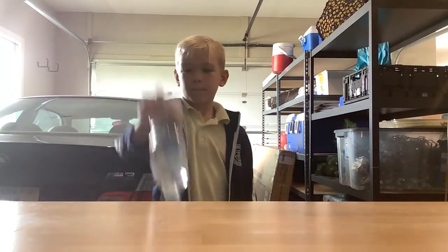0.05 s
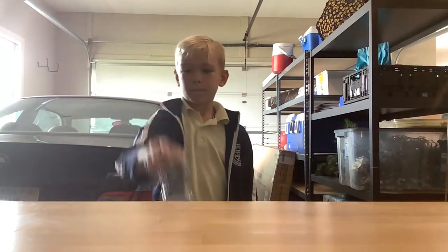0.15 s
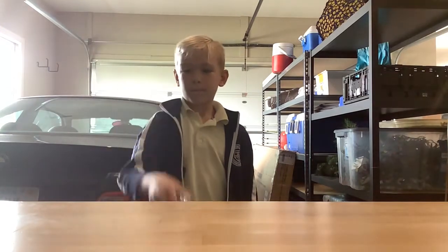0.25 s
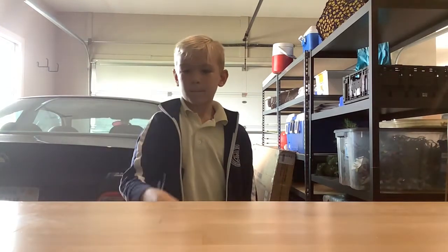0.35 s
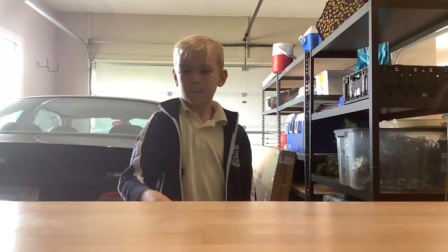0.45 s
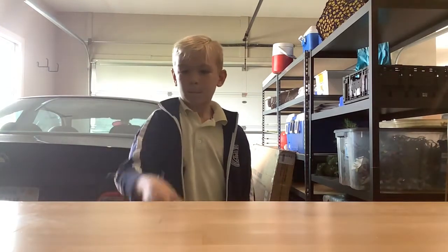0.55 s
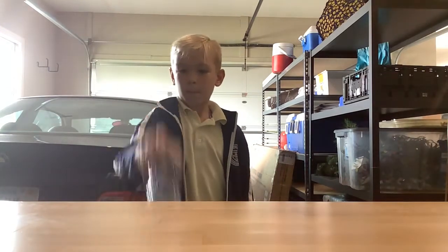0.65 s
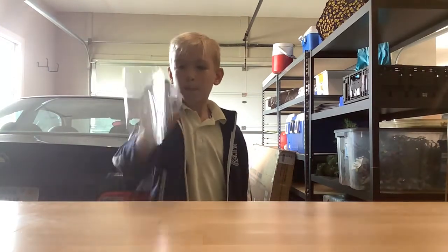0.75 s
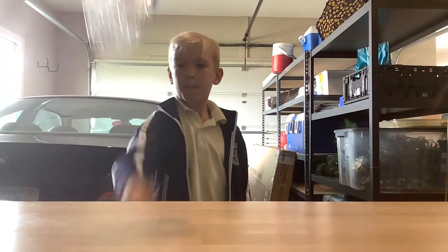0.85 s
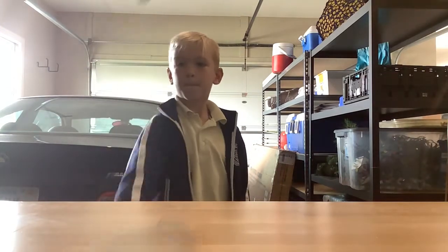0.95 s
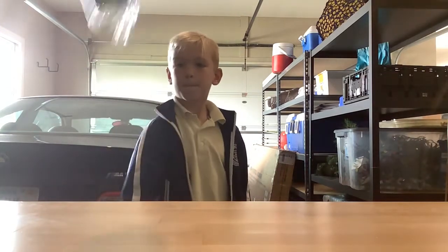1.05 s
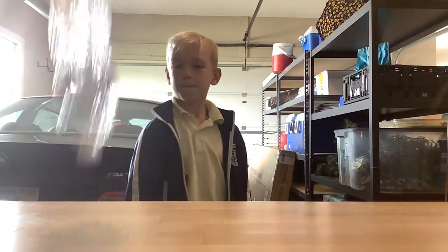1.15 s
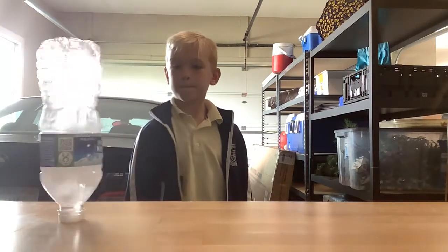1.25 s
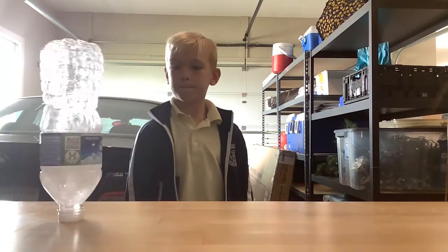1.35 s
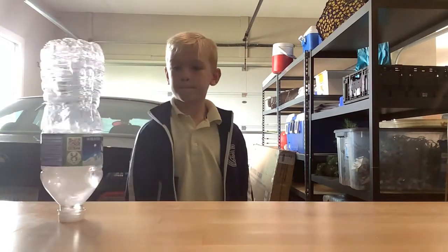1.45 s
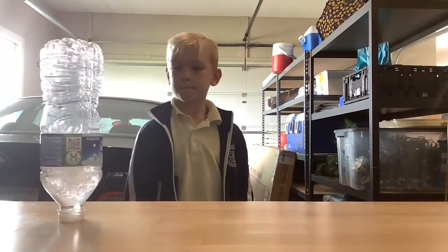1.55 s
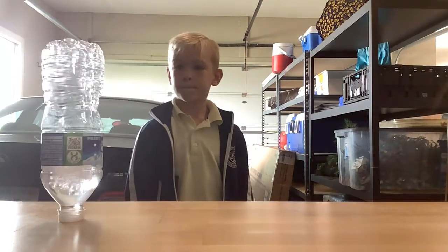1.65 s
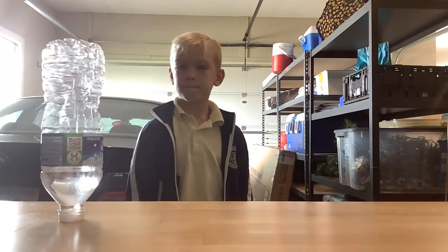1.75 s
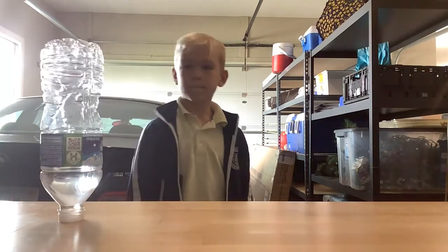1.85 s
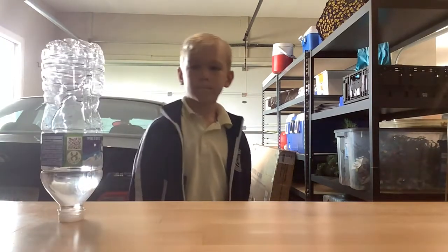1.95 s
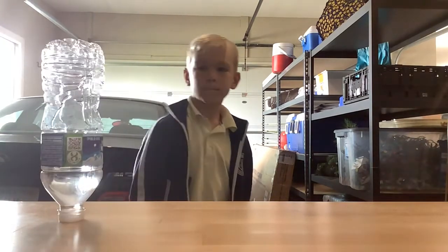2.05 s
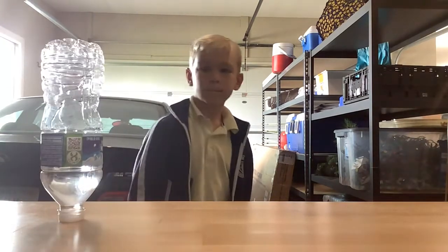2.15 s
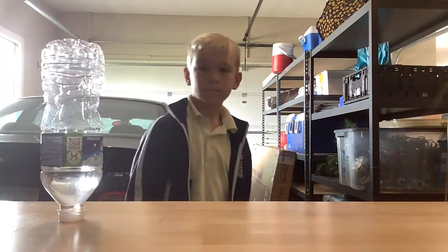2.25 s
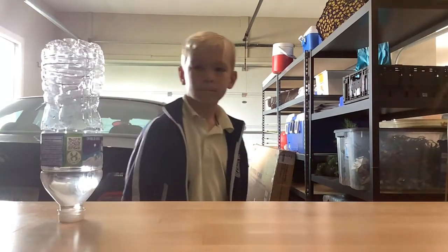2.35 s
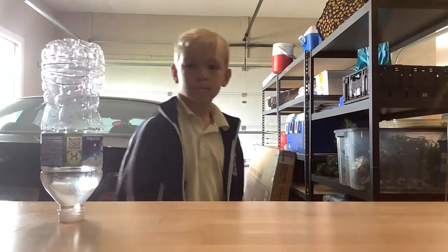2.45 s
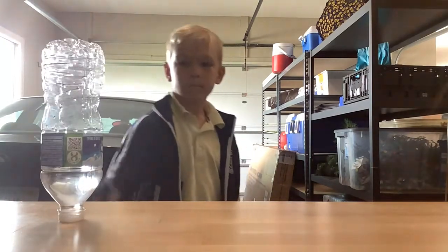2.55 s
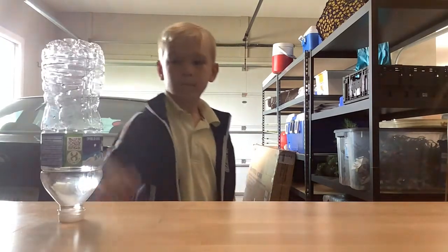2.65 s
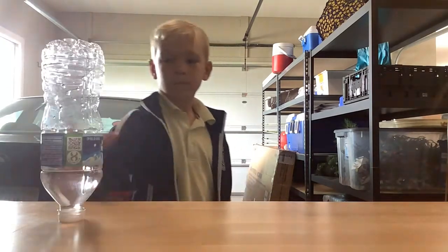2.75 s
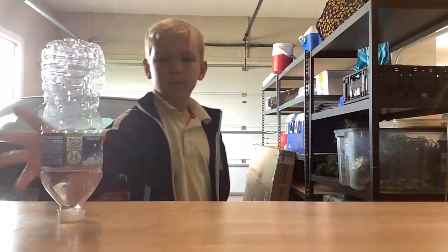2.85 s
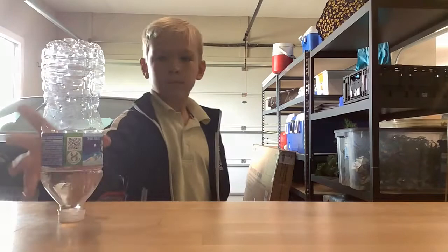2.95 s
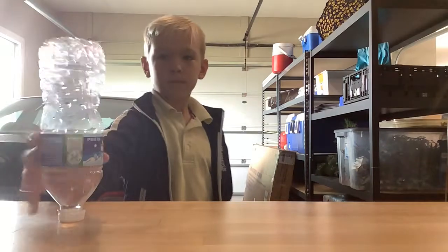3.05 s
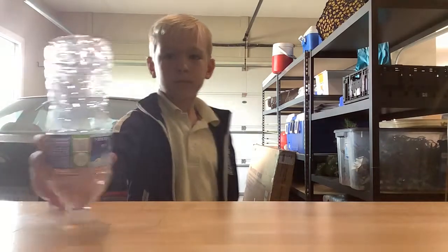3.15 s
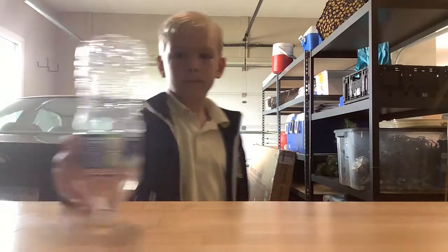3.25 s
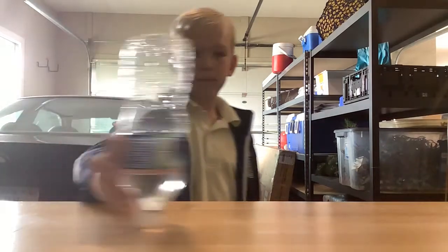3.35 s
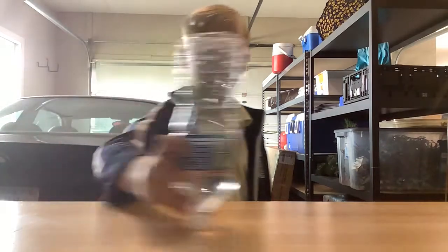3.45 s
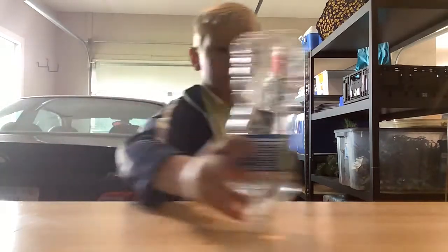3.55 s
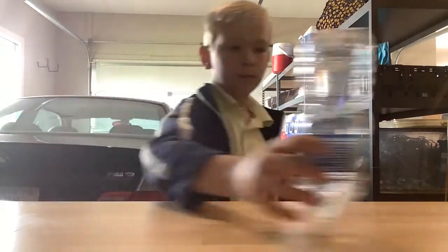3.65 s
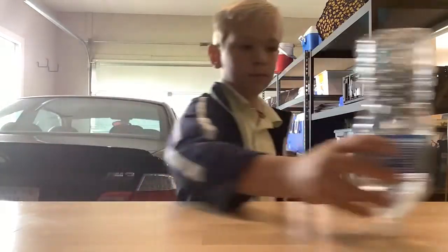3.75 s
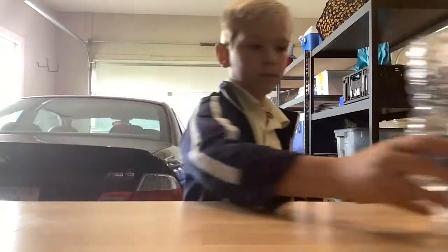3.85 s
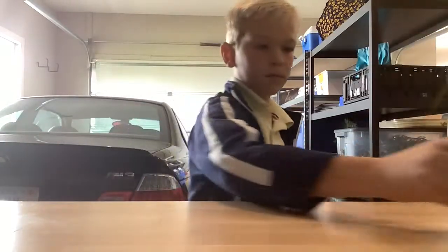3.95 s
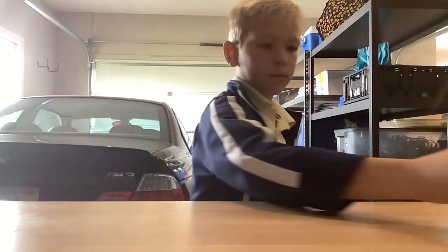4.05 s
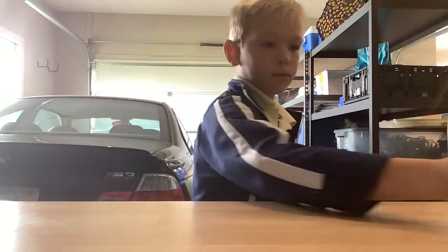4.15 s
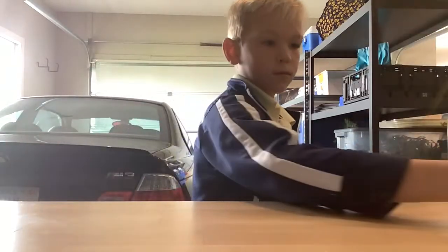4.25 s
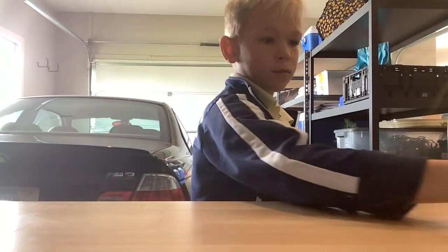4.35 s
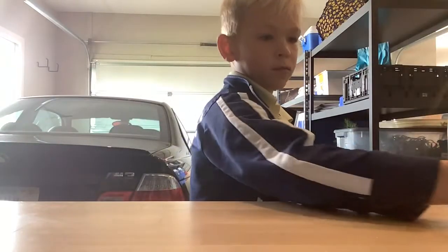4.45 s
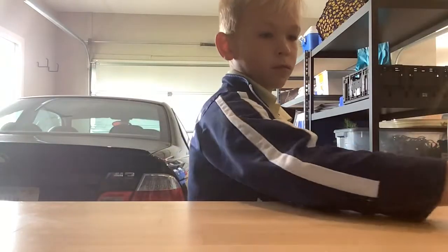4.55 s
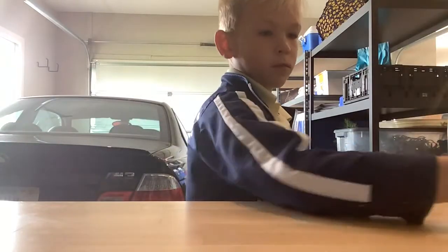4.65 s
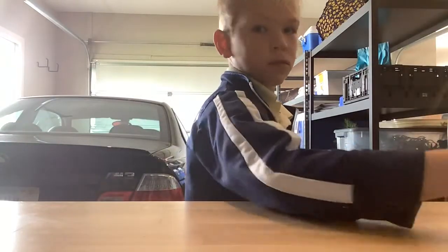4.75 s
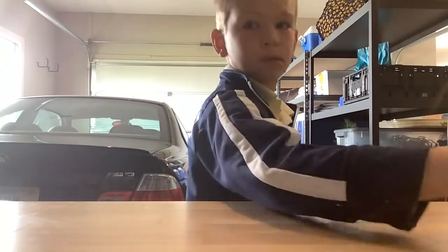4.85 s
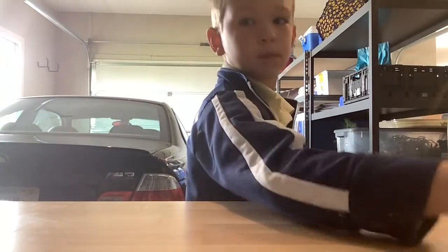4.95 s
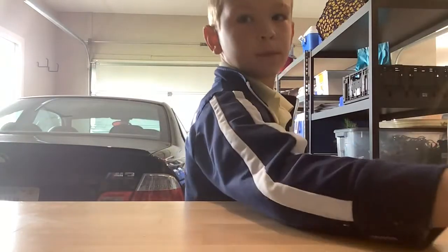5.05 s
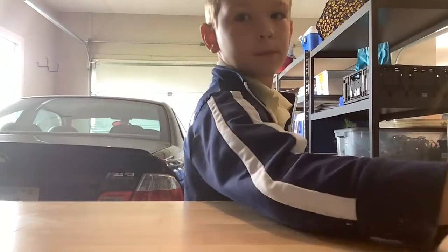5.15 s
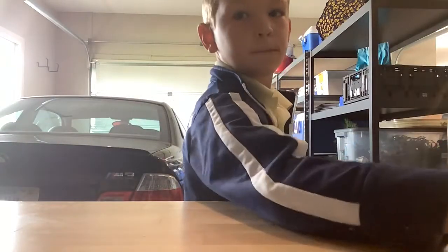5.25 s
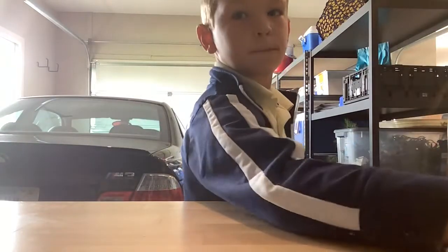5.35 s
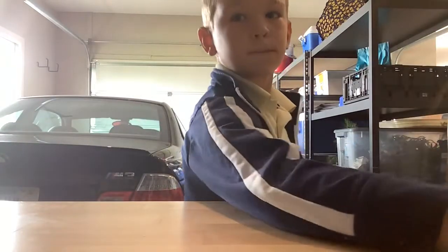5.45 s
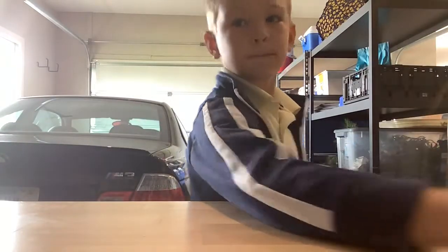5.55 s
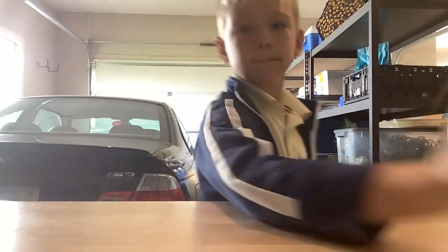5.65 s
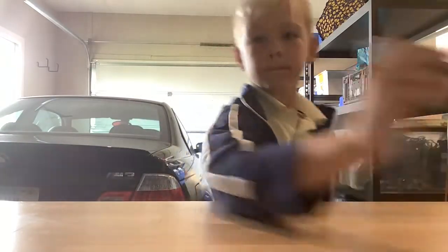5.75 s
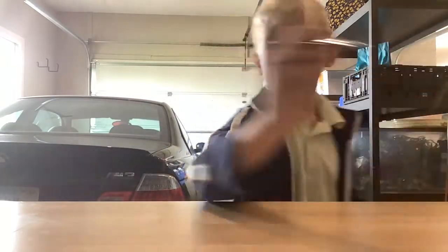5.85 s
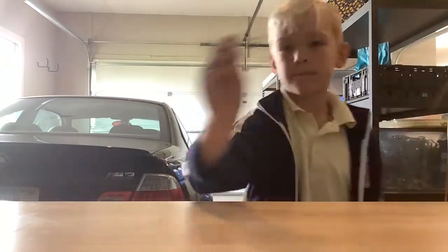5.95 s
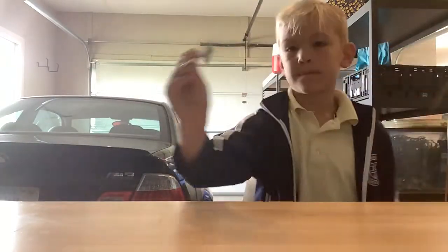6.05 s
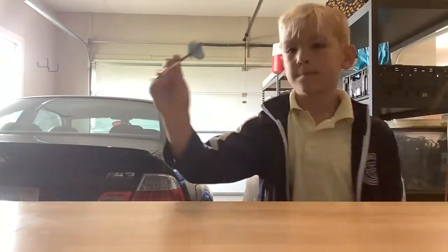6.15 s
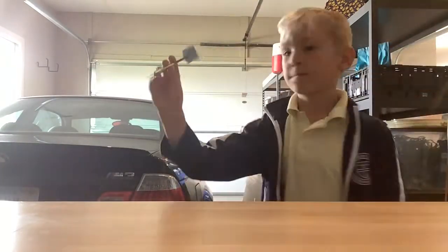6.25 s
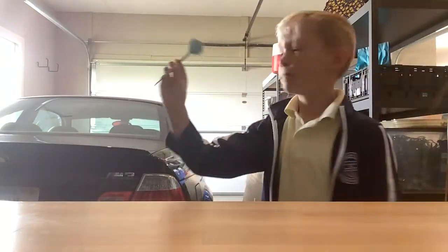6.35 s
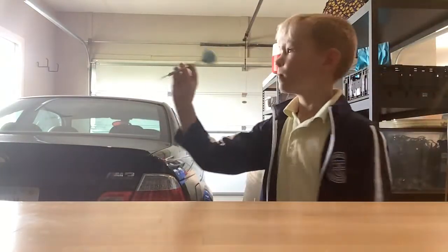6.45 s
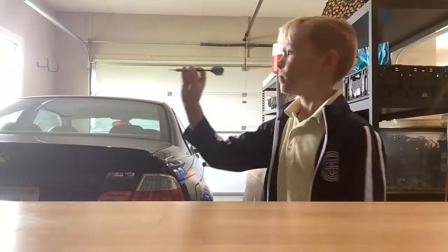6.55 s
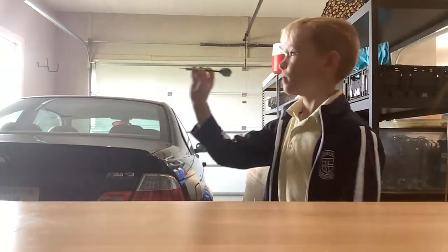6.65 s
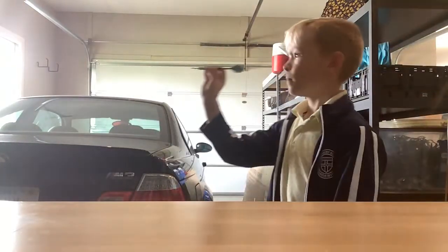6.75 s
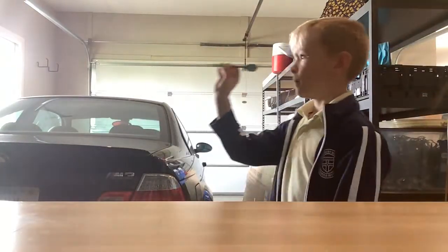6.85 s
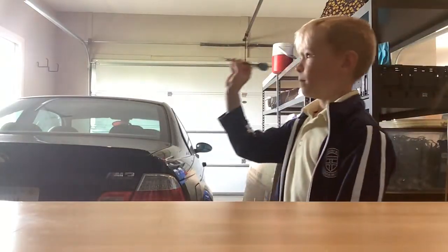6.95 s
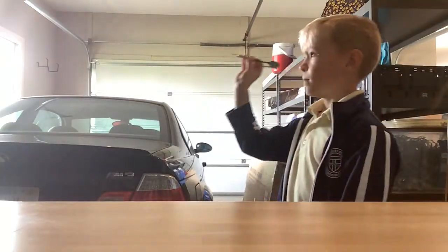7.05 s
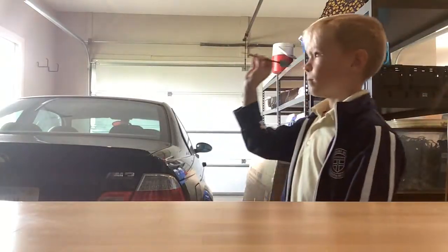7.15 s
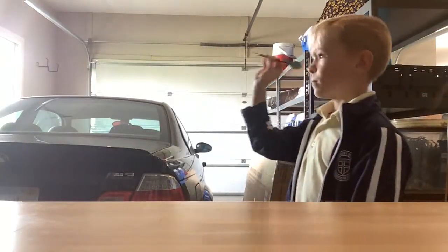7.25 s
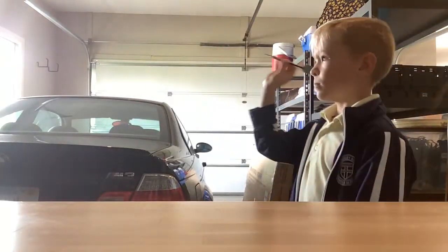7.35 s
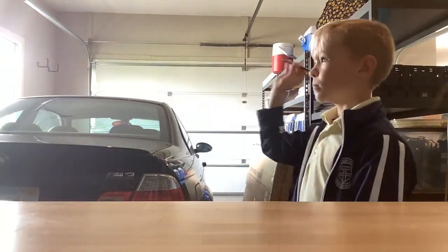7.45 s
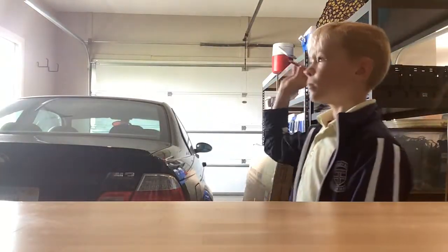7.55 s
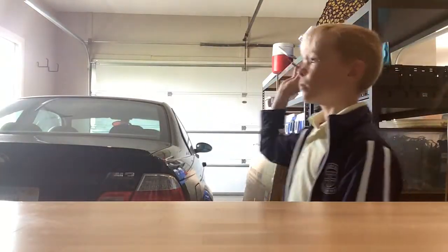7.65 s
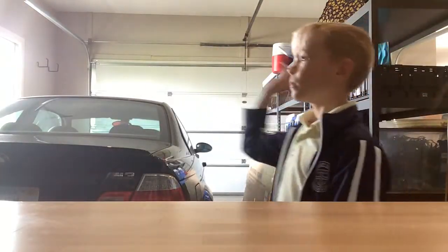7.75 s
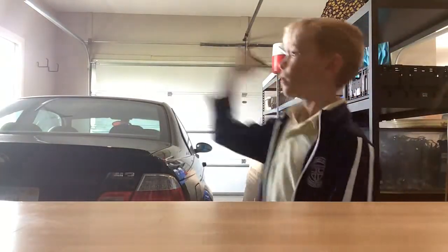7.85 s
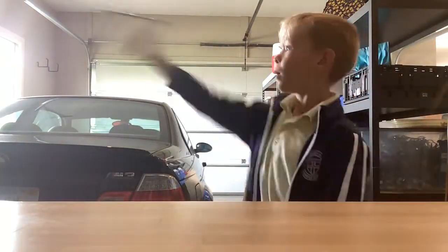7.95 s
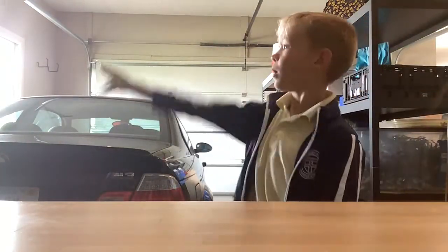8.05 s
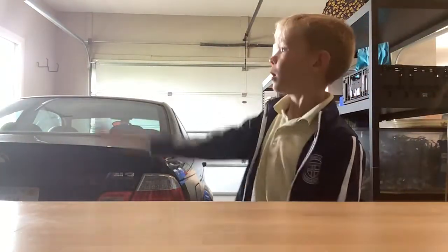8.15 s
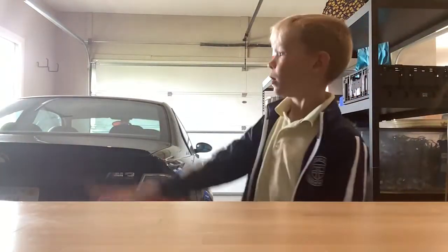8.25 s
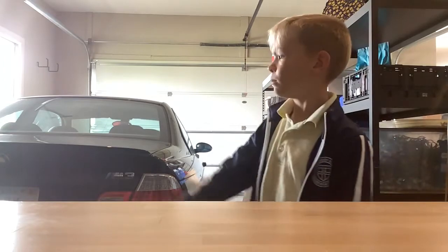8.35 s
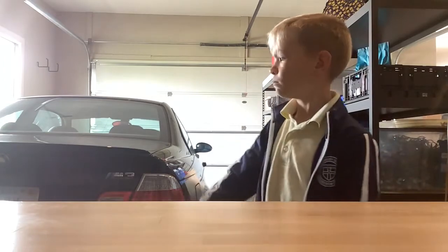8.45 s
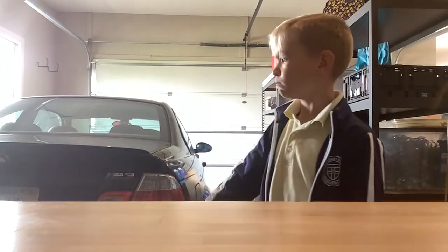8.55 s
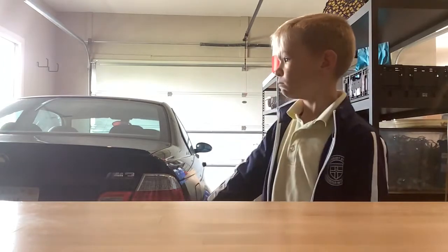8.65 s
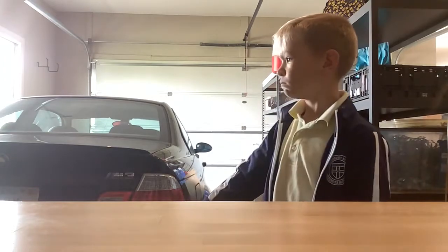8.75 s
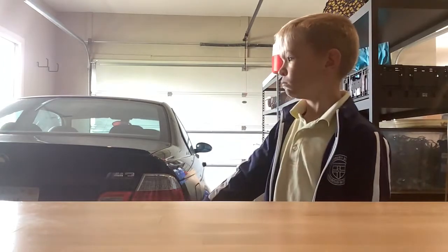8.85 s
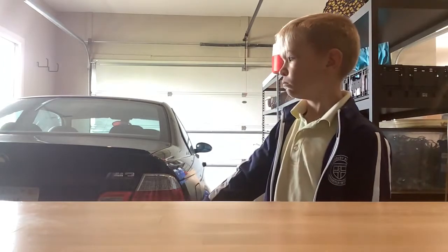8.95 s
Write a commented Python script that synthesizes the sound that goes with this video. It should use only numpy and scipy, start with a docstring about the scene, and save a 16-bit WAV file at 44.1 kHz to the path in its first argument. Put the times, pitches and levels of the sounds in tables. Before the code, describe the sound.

A faint distant motor hums low under soft rushing air throughout, in a hard-walled garage. Around 0.5 s thin plastic pops under fingers; from 0.72 to 0.95 s it crackles lightly while water glugs and swishes. At 1.15-1.19 s comes the loudest moment: a tight cluster of sharp blows, woody thunk and plastic crack together, with a short echo. Water splashes and bubbles, falling back at 1.2 and 1.33 s, fading by about 2 s. From 3.0 to 4.5 s the bottle is pushed across the table, juddering, hissing with grit, groaning and squeaking, with uneven catches; a small plastic pop ends it. Between 4.95 and 5.6 s a bump, brushing hand and cuff, and bright ticks and a skid of a dart near 5.45 s. Quiet follows, with a barely audible sleeve swish at 7.9 s. At 8.42 s the dart hits: a sharp tap into a hollow boom and rattle farther away, ringing out briefly.

```python
"""Bottle flip and dart throw in a garage

Close by, a partly filled plastic bottle is gripped, flipped and lands cap down on a wooden table: force pulses
ring wood and bottle, noise cracks the plastic, and bubbles and drops make the water splash and settle.
Pushed aside, the bottle judders: random clicks ring the table and hiss as grit. A dart scrapes as filtered
clicks, then thuds into a hollow board further off, which booms in modes and rattles in noise.
A motor hums faintly as wavering tones over rushing air; decaying noise bands are the garage's echo."""
import sys
import numpy as np
from scipy import signal
from scipy.fft import rfft, irfft, next_fast_len
from scipy.io import wavfile

SR = 44100
rng = np.random.default_rng(int(sys.argv[2]) if len(sys.argv) > 2 else 0)


def unload_audio(sound):
    """Save the sound as a 16-bit wav file, at the path given as the first command line argument."""
    columns = np.transpose(np.atleast_2d(sound))
    # keep every value between -1 and 1, then stretch to whole-number steps
    steps = np.round(np.clip(columns, -1, 1) * 32767)
    wavfile.write(sys.argv[1], SR, steps.astype(np.int16))


N = 396459
TIME = np.arange(N) / SR  # s

# the cap strikes, then the weight of the water follows: (time [s], level [dB], softness [ms])
LANDING = [(1.1515, -29, 0.023), (1.1703, -10, 0.02), (1.1726, 1, 0.014), (1.1757, 8, 0.1),
           (1.1795, -4, 0.022), (1.1813, 0.5, 0.14), (1.1858, -11, 0.09)]
# scrape and crackle spectrum, for hand, cuff and thin plastic: (frequency [Hz], level [dB])
SCRAPE_COLOUR = [(400, -20), (1100, -9), (2200, -15), (3000, -6.5), (3400, -11), (4400, -1), (6700, -0.5),
                 (9400, -11), (10800, -8), (13000, -15.5), (16000, -23.5)]


def thunk():
    """The landing blows ring wood and bottle; the cap's rim grazes and its teetering keeps the table trembling."""
    # bottle and table top ringing together: (frequency [Hz], level [dB], t60 [s])
    table_modes = [(81, -20.5, 0.2), (128.5, -11.5, 0.069), (194, -16.5, 0.04), (329.5, -28.5, .08),
                   (397, -20.5, 0.11), (517, -25, 0.09), (663, -23, 0.054), (798, -18.5, .04),
                   (970, -20.5, 0.092), (1396, -24, 0.12), (1526, -16, 0.038), (1787, -16.5, 0.042),
                   (2240, -25, 0.025), (2680, -20, 0.02), (2970, -12, .04), (3800, -23, 0.036),
                   (7560, -19, .02)]
    # small resonances of the cap's rim: (frequency [Hz], level [dB], t60 [s])
    rim_modes = [(1600, -8, .008), (3100, 0, .008), (4100, -4.5, .007), (7800, -2.5, .008)]
    # the rim grazes the wood during the landing: (time [s], length [s], level [dB])
    grazes = [(1.157, .014, -26)]
    # the bottle teeters on its cap: (time [s], length [s], level [dB])
    teeters = [(1.22, .14, -43.5)]

    knock = blows(LANDING, ring(table_modes))
    rim = unit(through(grains(rate=8300, spread_db=1.5), ring(rim_modes)))
    graze = rim * strokes(grazes, attack_s=0.008, release_t60=0.01)
    tremble = unit(through(grains(rate=400, spread_db=4.0), ring(table_modes[:3])))
    teeter = tremble * strokes(teeters, attack_s=0.04, release_t60=1.34)
    # little sounds below the lowest mode
    return low_cut(knock + graze + teeter, hz=73)


def crack(crack_db=-9):
    """The same landing blows set off short decaying noise in the thin plastic."""
    # crack of the thin plastic: (frequency [Hz], level [dB])
    crack_colour = [(60, -17.5), (300, -2), (1200, 0), (2500, -4), (5000, -9), (8500, -1.5), (12000, -4.5),
                    (16000, -15)]
    brief = burst(crack_colour, t60=0.04)
    return amp(crack_db) * low_cut(blows(LANDING, brief), hz=80)


def bubble(hz, t60, rise):
    """A damped tone whose pitch climbs as the bubble nears the surface."""
    age = TIME[:int(t60 * SR)]
    cycles = hz * age * (1 + rise * age / t60 / 2)
    return np.sin(2 * np.pi * cycles) * fade(t60)[:len(age)]


def water(cycles=22, spread_db=6.5, swarm_db=-10.5, spray_db=-3):
    """A swarm of small bubbles, drops pattering on the plastic and a few big air pockets turning over."""
    # spectrum of the splash: (frequency [Hz], level [dB])
    splash = [(100, -11), (350, 3), (800, 0.5), (1500, -6), (2300, -15), (3200, -5), (5000, -10.5),
              (9000, -9), (12000, -18.5), (16000, -31.5)]
    # big air pockets: (time [s], level [dB], starting pitch [Hz], t60 [s])
    air_pockets = [(.749, -37.5, 413.7, 0.0535), (.772, -33.5, 397.6, 0.13), (.811, -30.5, 372, 0.048),
                   (.857, -33, 365, 0.05), (.859, -40.5, 997, 0.054), (1.203, -20, 363, .15)]
    # the flip throws the water about, it slams down on landing and falls back twice:
    # (time [s], length [s], level [dB])
    sloshes = [(.74, 0.1, -51.5), (.8, 0.014, -46.5), (1.168, 0.0062, -23.5), (1.2, 0.068, -29),
               (1.325, 0.075, -33)]

    swarm, glugs = np.zeros(N), np.zeros(N)
    for when, pitch, size in rng.random((1500, 3)):
        hz = 300 * 20 ** pitch
        level = amp(spread_db * min(-np.log(size), 3)) * np.sqrt(hz)
        add(swarm, when * 2, level * bubble(hz, cycles / hz, rise=0.18))
    swarm = colour(np.diff(swarm, prepend=0), splash[:5] + [(6000, -21)])
    swarm = swarm * np.sqrt(2 / TIME[-1])  # it fills only the first 2 s: set its rms there to about 1
    spray = colour(grains(rate=5000, spread_db=3.0), splash)
    for s, db, hz, t60 in air_pockets:
        add(glugs, s, amp(db) * bubble(hz, t60, rise=0.06))
    motion = strokes(sloshes, attack_s=0.012, release_t60=0.42)
    return motion * (amp(swarm_db) * swarm + amp(spray_db) * spray) + glugs


def grip(skirt_db=-9):
    """The thin wall pops in short noise bursts under the fingers and crackles as the wrist flicks."""
    # the bottle wall buckling: (time [s], level [dB], pitch [Hz], t60 [s])
    crinkles = [(.531, -33, 4050, 0.014), (.5345, -34, 6200, 0.048), (.751, -45.5, 3000, 0.07),
                (.7695, -34.5, 1300, 0.028), (.816, -39.5, 4973, 0.045), (.835, -43, 4200, .04),
                (.855, -39, 3594, 0.064), (.875, -41.5, 3800, 0.017), (.932, -53.5, 8980, .05),
                (4.547, -47, 4930, 0.023)]
    # crackling of the flick: (time [s], length [s], level [dB])
    crackles = [(.72, .07, -64), (.79, .16, -60), (.795, .03, -42)]
    crackle = colour(grains(rate=5100, spread_db=2.5), SCRAPE_COLOUR)
    return snaps(crinkles, skirt_db) + strokes(crackles, attack_s=0.018, release_t60=0.074) * crackle


def slide(brighten=1.1, groan_db=-40, groan_law=0.46, tremble_db=-55, tremble_law=0.087):
    """The cap sticks and slips: slips shake table and bottle, grit hisses with the effort of the push."""
    # effort of the push, as the level of the hiss before brightening: (time [s], level [dB])
    push_levels = [(2.98, -106), (3.004, -72.5), (3.204, -66), (3.252, -51), (3.514, -50), (3.518, -48.5),
                   (3.842, -46), (4.422, -64), (4.53, -77)]
    # modes of the pushed bottle: (frequency [Hz], level [dB], t60 [s])
    slide_modes = [(380.36, -4, 0.24), (403.8, -4, 0.14), (461, -12.5, 0.044), (559, -4, 0.031),
                   (704, -1.5, 0.02), (775.4, -14.5, 0.1), (1140, -22, 0.04), (1930, -17, 0.02),
                   (3350, -40.5, 0.022)]
    # low modes of the shaken table: (frequency [Hz], level [dB], t60 [s])
    judder_modes = [(140.8, -2, 0.2), (119, -9.5, 0.098)]
    # spectrum of grit under the cap: (frequency [Hz], level [dB])
    grit_colour = [(200, -26), (550, 3), (900, -1.5), (1400, 1.5), (2200, -5), (3100, -1), (4100, -5),
                   (4900, -10), (7300, -10), (9500, -9), (11000, -13), (15500, -18.5)]
    # the cap chatters and shakes the table: (time [s], length [s], level [dB])
    judders = [(3.06, .07, -49), (3.255, 0.047, -47), (3.385, 0.035, -46), (3.53, 0.105, -51),
               (3.79, .035, -47.5), (4.05, 0.026, -44), (4.4, 0.18, -56.5)]
    # the cap squeaks: (time [s], length [s], level [dB])
    squeaks = [(3.25, 0.13, -56), (4.07, 0.05, -51), (4.27, 0.153, -61)]
    # the rim of the cap sizzles: (time [s], length [s], level [dB])
    sizzles = [(3.28, 0.36, -55)]
    # the cap catches on the wood: (time [s], level [dB])
    catches = [(3.091, -43), (3.432, -35.5), (3.588, -38), (3.79, -32.5), (3.99, -40.5), (4.15, -38.5),
               (4.19, -39), (4.3, -43)]
    # the hand bumps the table: (time [s], level [dB])
    bumps = [(3.062, -37), (3.097, -37), (3.685, -33), (4.962, -38.5)]

    push = swell(push_levels)
    effort = push / push.max()
    judder = unit(through(grains(rate=350, spread_db=0.0), ring(judder_modes)))
    body = unit(low_cut(through(grains(rate=700, spread_db=-0.5), ring(slide_modes)), hz=341))
    squeak = unit(through(grains(rate=590, spread_db=4.5), ring([(1480, 0, 0.031)])))
    grit = edge_echoes(colour(grains(rate=5000, spread_db=4.0), grit_colour))
    sizzle = unit(through(grains(rate=8900, spread_db=8.0), ring([(9100, 0, 0.0049)])))

    # a harder push hisses louder and brighter
    hiss = push * (grit + brighten * effort * np.diff(grit, prepend=0))
    # groan and tremble lose their law's dB for each dB of effort lost
    groan = body * amp(groan_db) * effort ** groan_law
    tremble = amp(tremble_db) * effort ** tremble_law
    shake = judder * (tremble + strokes(judders, attack_s=0.012, release_t60=0.11))
    singing = squeak * strokes(squeaks, attack_s=0.0138, release_t60=0.31)
    singing += sizzle * strokes(sizzles, attack_s=0.115, release_t60=0.4)
    contacts = knocks(catches, slide_modes) + knocks(bumps, judder_modes)
    return low_cut(hiss + groan + shake + singing + contacts, hz=85)


def edge_echoes(x):
    """Waves also arrive from the table's edges; their lags drift as the bottle moves, so the colour wanders."""
    # paths to the microphone: (lag at the start of the push [ms], drift [ms/s], share [ratio])
    edge_paths = [(.9, .5, .35), (1.7, 1.1, -.5), (3.9, -1.3, .55), (5.2, .9, -.45)]
    push_start_s = 3
    out = x
    for lag_ms, drift, share in edge_paths:
        lag = (lag_ms + drift * (TIME - push_start_s)) / 1000
        out = out + share * np.interp(TIME - lag, TIME, x)
    return unit(out)


def pick_up():
    """Dense random clicks brush as hand and cuff and skid as the dart; small hard clicks sound on the table."""
    # hand and cuff brush over the table: (time [s], length [s], level [dB])
    brushes = [(4.953, 0.039, -50), (5.11, .018, -65), (5.173, .06, -49), (5.225, 0.088, -45.5),
               (5.242, 0.019, -41), (5.352, 0.04, -54.5), (5.415, 0.093, -52.5), (5.54, 0.21, -64)]
    # the dart skids on the wood: (time [s], length [s], level [dB])
    skids = [(5.4405, .0135, -21.5), (5.476, .004, -49), (5.498, .006, -39)]
    # spectrum of the skids: (frequency [Hz], level [dB])
    skid_colour = [(400, -22), (1300, -33.5), (1800, -19.5), (3300, -27.5), (4400, 1.5), (5500, -5.5),
                   (7400, -3), (9400, -13), (12000, -12.5), (16000, -23)]
    # small hard clicks close by: (time [s], level [dB], pitch [Hz], t60 [s])
    ticks = [(2.3, -65, 8000, 0.029), (3.04, -61, 9000, 0.018), (5.188, -30.5, 6800, 0.0049),
             (5.4425, -21, 6500, 0.00365), (5.4525, -19, 5460, 0.0033), (5.5005, -39.5, 4000, 0.03)]

    brush = colour(grains(rate=16000, spread_db=4.0), SCRAPE_COLOUR)
    brush = brush * strokes(brushes, attack_s=0.008, release_t60=0.12)
    skid = colour(grains(rate=32000, spread_db=4.0), skid_colour)
    skid = skid * strokes(skids, attack_s=0.01236, release_t60=0.011)
    return brush + skid + low_cut(snaps(ticks, skirt_db=-11), hz=2540)


def throw(rattle_db=-21, rattle_t60=0.38):
    """The sleeve swishes as noise; the dart's blows make the hollow board boom in modes and rattle in noise."""
    # the point goes in, then the barrel drives the board against its backing:
    # (time [s], level [dB], softness [ms])
    dart = [(8.4195, -21, .02), (8.4222, -.5, 0.026), (8.4294, 3.5, 0.27), (8.436, 4.5, 0.64)]
    # the hollow board's boom: (frequency [Hz], level [dB], t60 [s])
    board_modes = [(104.2, -31, 0.16), (121, -29, 0.15), (140.4, -22, 0.09), (172.5, -19.5, 0.3),
                   (197, -21, 0.17), (294, -30, 0.29), (304, -22, 0.3), (387, -37, 0.15), (488, -26, 0.16),
                   (511, -38, 0.097)]
    # broad spectrum of the board's rattle: (frequency [Hz], level [dB])
    rattle_colour = [(50, -1), (140, 9.5), (500, 6), (1000, -8), (3000, -8.5), (4400, -13.5), (5200, -15),
                     (8000, -13.5), (12000, -13.5), (16000, -29)]
    # clusters of close modes that colour the rattle: (centre [Hz], width [Hz], gain [dB])
    board_peaks = [(798, 180, 7.5), (1230, 330, 12), (1706, 210, 9.5), (2300, 200, 8.5), (2740, 350, 3.5),
                   (3196, 215, 11), (3800, 270, 10), (4220, 330, 9.5), (6320, 570, 8)]
    # the sleeve on the throwing arm: (time [s], length [s], level [dB])
    swishes = [(7.88, 0.137, -63)]
    # spectrum of the sleeve: (frequency [Hz], level [dB])
    sleeve_colour = [(2000, -38), (4500, -12.5), (6800, -5.5), (7700, 7), (9000, -12), (13000, -3),
                     (16000, -8.5)]

    hz = np.geomspace(30, SR / 2, 400)
    shape_db = at_hz(rattle_colour, hz)
    for centre, width, db in board_peaks:
        shape_db = shape_db + db * np.exp(-(2 * (hz - centre) / width) ** 2)
    rattle = burst(np.column_stack([hz, shape_db]), rattle_t60)
    sleeve = colour(rng.standard_normal(N), sleeve_colour)
    sleeve = sleeve * strokes(swishes, attack_s=0.12, release_t60=0.2)
    board = blows(dart, ring(board_modes) + amp(rattle_db) * rattle)
    # a small board radiates little below its first mode
    return sleeve + low_cut(board, hz=107)


def motor(air_db=-57, waver_db=1.0):
    """A distant motor: shaft harmonics of wavering level over a soft rush of air."""
    # spectrum of the rushing air: (frequency [Hz], level [dB])
    air = [(15, -70.5), (25, -41), (35, -18.5), (48, -13), (144, -6.5), (240, -6), (274, -14.5),
           (349, -2.5), (389, -13.5), (433, -7), (482, -20.5), (523, -15), (1250, -28.5), (2060, -41.5),
           (6920, -45), (15500, -49)]
    # shaft harmonics: (frequency [Hz], rms level before wavering [dB])
    hum = [(59.2, -68), (118.4, -69), (177.6, -71.5), (236.9, -62), (355.3, -72.5)]
    out = amp(air_db) * colour(rng.standard_normal(N), air)
    for hz, db in hum:
        level = np.sqrt(2) * amp(db + waver_db * walk(rate=3.7))
        out = out + level * np.sin(2 * np.pi * (hz * TIME + rng.random()))
    return out


def garage():
    """Diffuse echo off bare walls: noise in half-octave bands, each with its own decay; total energy 1."""
    # decay of the echo: (frequency [Hz], t60 [s])
    garage_t60 = [(100, 0.4), (300, 0.66), (1000, 0.83), (3000, 0.7554), (6000, 0.6046), (10000, 0.42),
                  (14000, 0.01)]
    # spectrum of the echo's noise before it decays: (frequency [Hz], level [dB])
    garage_colour = [(60, -10), (200, -3.5), (600, -3), (2000, 2.5), (8000, 5.5), (16000, 1)]
    hz = np.fft.rfftfreq(SR, 1 / SR)
    band = np.round(2 * np.log2(np.maximum(hz, 50)))
    noise = rfft(colour(rng.standard_normal(SR), garage_colour))
    tail = np.zeros(SR)
    for b in np.unique(band):
        tail += irfft(noise * (band == b), SR) * fade(at_hz(garage_t60, 2 ** (b / 2)))
    build_up = 1 - np.exp(-(TIME[:SR] / 0.008) ** 2)
    return unit(tail * build_up) / np.sqrt(SR)


def blows(contacts, response):
    """Each contact is a short push on the body; softer ones last longer and sound duller."""
    force = np.zeros(N)
    for s, db, soft_ms in contacts:
        age = (TIME[:SR // 100] + 1 / SR) * 1000 / soft_ms
        pulse = age * np.exp(-age)
        add(force, s, amp(db) * pulse / pulse.sum())
    return through(force, response)


def knocks(rows, modes):
    """Light knocks at (s, dB) on a set of modes."""
    out, response = np.zeros(N), ring(modes)
    for s, db in rows:
        add(out, s, amp(db) * response)
    return out


def snaps(rows, skirt_db):
    """Brief bursts of noise, each around its own pitch."""
    out = np.zeros(N)
    for s, db, hz, t60 in rows:
        hump = [(hz / 10, 2 * skirt_db), (hz / 2, skirt_db / 2), (hz, 0), (hz * 2, skirt_db), (hz * 10, 4 * skirt_db)]
        add(out, s, amp(db) * burst(hump, t60))
    return out


def burst(points, t60):
    """Decaying noise that keeps a smooth (Hz, dB) spectrum however brief it is."""
    phase = np.angle(rfft(rng.standard_normal(SR) * fade(t60)))
    level = amp(at_hz(points, np.fft.rfftfreq(SR, 1 / SR)))
    sound = irfft(np.exp(1j * phase) * level, SR) * fade(4 * t60)
    return unit(sound) * np.sqrt(np.mean(fade(t60) ** 2))


def ring(modes):
    """Impulse response of (Hz, dB, t60) modes: decaying sines."""
    return sum(amp(db) * np.sin(2 * np.pi * hz * TIME[:SR]) * fade(t60) for hz, db, t60 in modes)


def grains(rate, spread_db):
    """Random clicks of either sign and uneven size, rate per second."""
    hits = rng.random(N) < rate / SR
    signs = rng.choice([-1, 1], N)
    return hits * signs * amp(spread_db * rng.exponential(size=N).clip(0, 4))


def strokes(rows, attack_s, release_t60):
    """Gain of (s, length s, dB) gestures: each rises, holds to the end of its length and dies away."""
    power = np.zeros(N)
    for s, length, db in rows:
        rise = np.clip((TIME - s) / attack_s, 0, 1)
        fall = np.exp(-np.log(1000) * np.maximum(TIME - s - length, 0) / release_t60)
        power += (amp(db) * rise * fall) ** 2
    return np.sqrt(power)


def swell(rows):
    """Gain along (s, dB) rows, silent outside them."""
    s, db = np.transpose(rows)
    return amp(np.interp(TIME, s, db)) * (TIME >= s[0]) * (TIME <= s[-1])


def walk(rate):
    """Random levels, rate per second, joined by straight lines."""
    return np.interp(TIME * rate, np.arange(2000), rng.standard_normal(2000))


def fade(t60):
    """One second of exponential decay, losing 60 dB in t60 seconds."""
    return np.exp(-np.log(1000) * TIME[:SR] / t60)


def colour(x, points):
    """Filter x by a (Hz, dB) curve and set its rms to 1."""
    size = next_fast_len(len(x))
    gain = amp(at_hz(points, np.fft.rfftfreq(size, 1 / SR)))
    return unit(irfft(rfft(x, size) * gain, size)[:len(x)])


def at_hz(points, hz):
    """Read (Hz, value) points on a log-frequency axis."""
    f, value = np.transpose(points)
    return np.interp(np.log(hz + 1), np.log(f), value)


def low_cut(x, hz):
    """Remove what lies below hz."""
    return signal.sosfilt(signal.butter(5, hz, "high", fs=SR, output="sos"), x)


def through(x, response):
    """Pass x through an impulse response."""
    return signal.fftconvolve(x, response)[:N]


def add(track, s, sound):
    """Mix a sound in at time s."""
    start = int(s * SR)
    track[start:start + len(sound)] += sound[:N - start]


def amp(db):
    """Turn dB into a gain."""
    return 10 ** (np.asarray(db) / 20)


def unit(x):
    """Scale x to rms 1."""
    return x / np.sqrt(np.mean(x ** 2))


def scene():
    """Each source sounds directly and sends its own share into the garage's echo; the motor stays dry."""
    # (sound, echo share): table sounds send less than most airborne ones
    sources = [(thunk(), amp(-15.5)), (crack(), amp(-10.0)), (water(), amp(-6.5)), (grip(), amp(-8.5)),
               (slide(), amp(-11.5)), (pick_up(), amp(-23)), (throw(), amp(-6))]
    direct = sum(sound for sound, share in sources)
    echo = through(sum(sound * share for sound, share in sources), garage())
    return (direct + echo + motor())[None]


def record(dry):
    """The microphone softly rounds loud peaks; the deep bass and the top are cut."""
    top_hz = 15800
    rounded = low_cut(np.tanh(dry), hz=42.7)
    return signal.sosfilt(signal.ellip(10, 0.2, 70, top_hz, fs=SR, output="sos"), rounded)


dry = scene()
out = record(dry)
unload_audio(out)
```